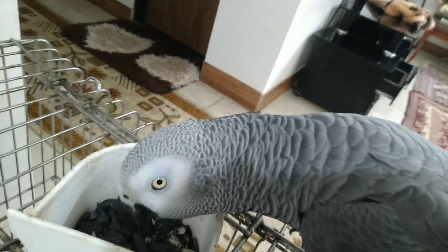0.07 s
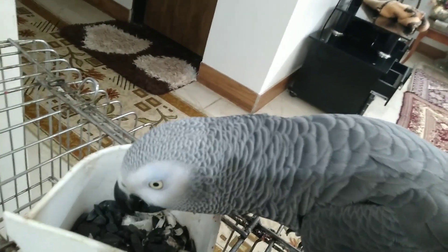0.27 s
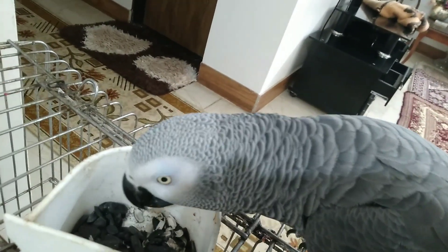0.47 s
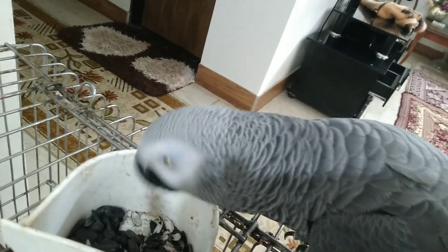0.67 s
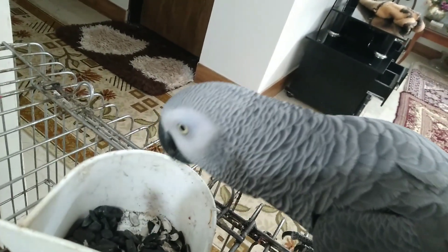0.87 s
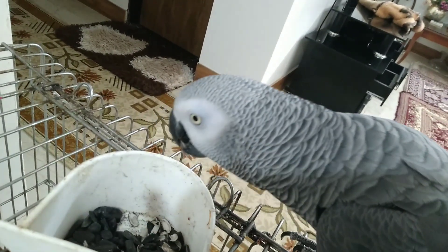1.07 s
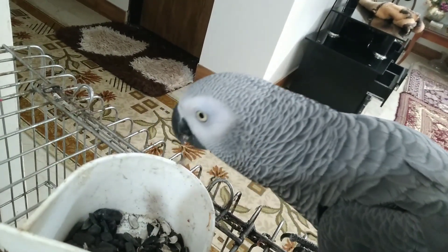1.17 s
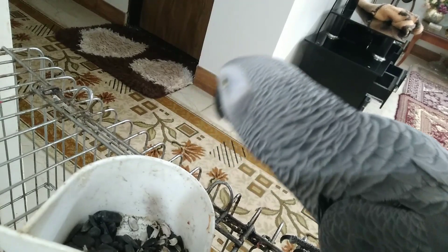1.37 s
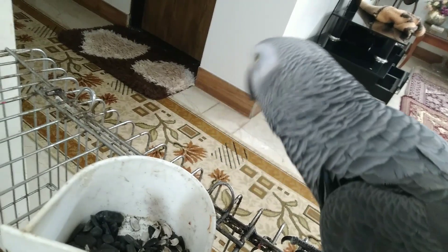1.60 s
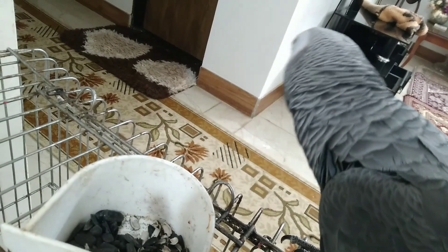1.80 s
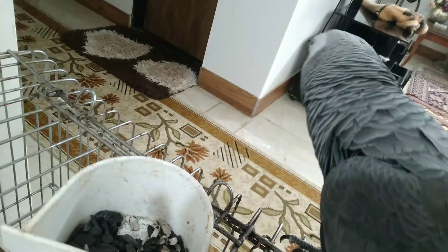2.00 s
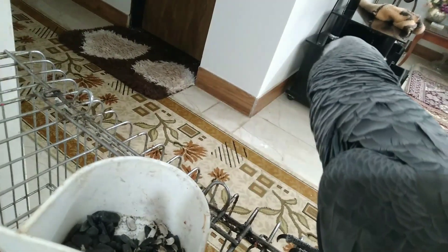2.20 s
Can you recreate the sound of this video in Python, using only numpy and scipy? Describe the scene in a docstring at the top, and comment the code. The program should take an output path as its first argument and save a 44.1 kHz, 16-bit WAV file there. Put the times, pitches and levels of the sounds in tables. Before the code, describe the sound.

A parrot's beak snaps seed shells hard, then ticks, squeaks faintly and drops a clattering husk

```python
"""A parrot cracks seeds over a plastic feeding cup, close to the microphone in a living room.
First come hard cracks: a bright snap, a brief shell ring, a hollow beak knock and fine crackle around them.
From about 1 s there are faint ticks and narrow squeaks as the beak rubs the kernel; at 1.6 s a husk clatters.
Weaker cracks follow near 1.8 and 2.2 s. Filtered noise, clicks and short resonances make these sounds.
Throughout, a decaying noise tail is the room, a low rumble lies below, and a noise gate ducks the pauses."""
import sys
import numpy as np
from scipy import signal
from scipy.fft import rfft, irfft
from scipy.io import wavfile
from scipy.ndimage import uniform_filter1d, minimum_filter1d

SR = 44100
rng = np.random.default_rng(int(sys.argv[2]) if len(sys.argv) > 2 else 0)


def persist_wave(psi):
    """Save psi, clipped to +-1, as 16-bit WAV."""
    counts = np.round(np.clip(psi, -1, 1) * 32767).astype(np.int16)
    wavfile.write(sys.argv[1], SR, np.atleast_2d(counts).T)


N = 99225

# colour of the snapping shell: f/Hz, level/dB
SNAP = [(100, -42), (3000, -47.5), (4100, -44.5), (4800, -26.5), (5500, -7), (6800, -1), (8600, -4),
        (10000, -9.5), (11700, -21.5), (16000, -12)]
# colour of the sizzle at the top of a snap: f/Hz, level/dB
SIZZLE = [(100, -62), (9000, -53.5), (12000, -15.5), (13300, -2), (15200, -4.5), (16500, -7)]


def undb(db):
    """Turn decibels into a gain."""
    return 10 ** (np.asarray(db) / 20)


def curve(points, hz):
    """Read values between (Hz, value) points on a log-frequency axis."""
    p = np.array(points, float)
    return np.interp(np.log(np.maximum(hz, 1)), np.log(p[:, 0]), p[:, 1])


def tint(x, points):
    """Filter a sound by (Hz, dB) points."""
    gain = undb(curve(points, np.fft.rfftfreq(len(x), 1 / SR)))
    return irfft(rfft(x) * gain, len(x))


def impact(points, size=1024):
    """Make a click of the given colour with its energy as early as possible (minimum phase)."""
    log_gain = np.log(undb(curve(points, np.fft.rfftfreq(size, 1 / SR))))
    cepstrum = irfft(log_gain)
    # fold the second half onto the first, so that nothing sounds before the hit
    cepstrum[1:size // 2] *= 2
    cepstrum[size // 2 + 1:] = 0
    return irfft(np.exp(rfft(cepstrum)))


def ring(hz, decay):
    """A resonance that swells and dies quickly; its gain is 1 at its centre."""
    t = np.arange(int(20 * decay * SR)) / SR
    env = t * np.exp(-t / decay)
    return 2 * env / env.sum() * np.sin(2 * np.pi * hz * t)


def add(out, at, x):
    """Mix a sound in at a time in seconds."""
    i = max(int(at * SR), 0)
    out[i:i + len(x)] += x[:max(N - i, 0)]


def unit(x):
    """Scale to rms 1."""
    return x / np.sqrt(np.mean(x ** 2))


def walk(rate):
    """A slow random wander with spread near 1, from smoothed steps at rate per second."""
    k = int(SR / rate)
    steps = np.repeat(rng.standard_normal(N // k + 1), k)
    return unit(uniform_filter1d(steps, k))[:N]


def scatter(x, size=700):
    """Splinters and near reflections follow a click as noise for a few milliseconds."""
    t = np.arange(size) / SR

    def burst(decay, db):
        noise = rng.standard_normal(size) * np.sqrt(t) * np.exp(-t / decay)
        return unit(noise) * undb(db) / np.sqrt(size)

    reflections = burst(decay=0.0022, db=-5)
    splinters = burst(decay=0.00029, db=-3.5)
    response = reflections + splinters
    response[0] = 1  # the click itself
    return np.convolve(x, response / np.linalg.norm(response))


def grains(length, colour):
    """A dense run of tiny ticks at random times with uneven strengths, rms 1."""
    ticks_per_s, spread_db = 650, 5.5
    n = int(length * SR)
    hit = rng.random(N)[:n] < ticks_per_s / SR
    size = rng.standard_normal(N)[:n]
    ticks = hit * np.sign(size) * undb(spread_db * np.abs(size))
    return unit(signal.fftconvolve(ticks, colour)[:n])


def cracks():
    """A shell snaps and rings; the beak knocks and clacks, and the cup's resonances answer."""
    # cracks: t/s, snap level/dB, sizzle level/dB, shell ring f/Hz, ring level/dB,
    # hollow knock f/Hz, knock level/dB, beak clack f/Hz, clack level/dB
    crack_table = [ (0.019, -21, -33, 14400, -0.5, 1200, -37.5, 2400, -23.5),
                   (0.0449, -3.5, -6, 6300, -12.5, 1231, -35, 2650, -17.5),
                   (0.0496, -17.5, -13.5, 7300, -26.5, 1200, -40.5, 2650, -20.5),
                   (.0820, 10.5, -4, 6500, 14.5, 1193, -5, 2300, -3.5),
                   (0.0855, 5, -16, 6300, 6, 1422, -8.5, 2680, -9),
                   (0.0879, 3, 5.5, 15400, 13, 1200, -10, 2905, -14),
                   (0.1563, -18.5, -10.5, 8600, -12.5, 1210, -22.5, 2400, -25),
                   (0.2095, -9, -7, 15400, -6, 1048, -18, 2700, -9.5),
                   (0.2116, -4.5, -20.5, 5850, 4, 1000, -15, 2350, -9.5),
                   (0.2343, -2.5, -26.5, 5980, 6, 960, -12, 2700, -17.5),
                   (0.2849, -6.5, -23, 6200, -13.5, 1074, -31, 1897, -19),
                   (0.2948, -7, -2.5, 8500, 5.5, 584, -15, 1930, -15),
                   (0.4236, -11, 2.5, 14900, -4, 581, -13.5, 2200, -40),
                   (0.433, -11.5, -11, 13500, -13.5, 970, -30.5, 2200, -26),
                   (0.44, 9.5, 8, 13800, 9.5, 965, -8.5, 2200, -6.5),
                   (0.4401, -8, 3.5, 5900, 14.5, 1200, -13, 3700, -9),
                   (0.4423, 4, 2.5, 6250, 5, 1250, -21, 4200, -9.5),
                   (0.4872, -0.5, -0.5, 15000, -7, 1000, -17, 2200, -12),
                   (.5197, -9.5, -6, 7200, -15, 570, -27, 2200, -36.5),
                   (0.5469, -7, -1, 7100, -11.5, 581, -18.5, 2300, -26),
                   (0.7112, -5.5, -6, 6600, -10, 580, -25.5, 2200, -28.5),
                   (.7848, 0, -6, 5500, 3, 680, -5.5, 2170, -1.5),
                   (0.7853, 3.5, 0, 6700, 15.5, 902.3, -1, 2900, -7),
                   (0.786, 2.5, -1.5, 15000, 5, 1800, -13, 2520, -3),
                   (1.749, -8.5, -42, 6600, -11, 1390, -17.5, 2000, -21.5),
                   (1.7755, -5, -28, 4700, -14, 1198, -21, 2410, -23),
                   (1.795, -7, -31, 8700, -4.5, 600, -14, 2380, -18),
                   (1.7998, -15, -35, 6680, -15, 587, -12, 2380, -24),
                   (2.1975, -9, -15, 10500, -6.5, 1200, -13.5, 2700, -19),
                   (2.2032, -18, -34, 6540, -7, 1450, -19, 2250, -28), ]
    # cup resonances: f/Hz, decay/s, relative level/dB
    cup_modes = [(722, .012, -4.5), (901.5, 0.0099, -4.5), (980, 0.02, -4.5), (1191.5, 0.02, -1),
                 (2000, 0.016, -4.5), (2657, 0.0088, -2.5), (2890, 0.012, -8.5)]
    shell_decay_s, knock_decay_s, clack_decay_s = 0.00038, 0.0019, 0.0011
    shell, rings, beak = np.zeros(N), np.zeros(N), np.zeros(N)
    snap, sizzle = impact(SNAP), impact(SIZZLE)
    for at, snap_db, top_db, ring_hz, ring_db, knock_hz, knock_db, clack_hz, clack_db in crack_table:
        add(shell, at, scatter(undb(snap_db) * snap + undb(top_db) * sizzle))
        add(rings, at, scatter(undb(ring_db) * ring(ring_hz, shell_decay_s)))
        add(beak, at, undb(knock_db) * ring(knock_hz, knock_decay_s))
        add(beak, at, undb(clack_db) * ring(clack_hz, clack_decay_s))
    # shell rings keep only their part above 5000 Hz
    rings = signal.sosfilt(signal.butter(6, 5000, "high", fs=SR, output="sos"), rings)
    cup = np.zeros(N)
    for hz, decay, mode_db in cup_modes:
        cup += undb(mode_db) * signal.fftconvolve(beak, ring(hz, decay))[:N]
    return shell + rings + beak + undb(3.0) * cup  # lifts all cup levels


def crackle():
    """Dense runs of tiny bright ticks: fine crackle and sizzling tails around the cracks."""
    # crackle: start t/s, length/s, rms level/dB
    crackle_table = [(0, 0.062, -53.5), (0.219, .12, -55.5), (0.562, 0.074, -59), (0.713, 0.023, -52),
                     (0.776, 0.14, -56.5), (1.612, 0.011, -56)]
    out = np.zeros(N)
    tick = impact(SNAP) + undb(-7.5) * impact(SIZZLE)
    for at, length, db in crackle_table:
        add(out, at, undb(db) * grains(length, tick))
    return out


def rubs():
    """The beak slides over the kernel: a soft, narrow squeak that swells, fades and sags in pitch."""
    # rubs: start t/s, length/s, squeak f/Hz, rms level/dB
    rub_table = [(1.003, 0.046, 6410, -64), (1.005, 0.022, 8360, -64.5), (1.51, .025, 6750, -69.5),
                 (1.764, .02, 6400, -53), (1.792, .012, 6435, -44.5), (1.806, 0.099, 6540, -63),
                 (1.892, .09, 5770, -68), (2.156, 0.037, 6580, -57.5), (2.154, .03, 8200, -63),
                 (2.155, 0.049, 5030, -69), (2.193, 0.058, 6480, -53)]
    width_hz, sag_hz_per_s = 390, 2000
    rise = 0.2  # share of the length
    lowpass = signal.butter(2, width_hz / 2, fs=SR, output="sos")
    out = np.zeros(N)
    for at, length, hz, db in rub_table:
        t = np.arange(int(length * SR)) / SR
        noise = rng.standard_normal(N) + 1j * rng.standard_normal(N)
        rough = signal.sosfilt(lowpass, noise)[-len(t):]  # the end, where the filter has settled
        # shift the slow noise up to the falling squeak pitch
        squeak = (rough * np.exp(2j * np.pi * (hz - sag_hz_per_s * t / 2) * t)).real
        swell = np.interp(t / length, [0, rise, 1], [0, 1, 0])
        add(out, at, undb(db) * unit(squeak * swell))
    return out


def nibbles():
    """The beak turns the kernel with tiny ringing ticks."""
    # faint nibbles: t/s, ring f/Hz, level/dB
    nibble_table = [(1.015, 14180, -18), (1.125, 6140, -13)]
    out = np.zeros(N)
    for at, hz, db in nibble_table:
        add(out, at, scatter(undb(db) * ring(hz, decay=0.00049)))
    return out


def clatter():
    """A husk strikes something hard, bounces and skitters to rest as a fading run of ticks."""
    # husk strikes: t/s, level/dB
    strike_table = [(1.619, -1.5), (1.6202, -8), (1.6207, 0), (1.6217, -1), (1.6499, -7), (1.652, -8.5)]
    # colour of a strike: f/Hz, level/dB
    husk_colour = [(100, -33), (850, -55.5), (1250, -16), (1800, -10), (3000, -8), (4200, -21), (5200, -11),
                   (5950, 3), (7200, -3), (8400, -1), (11000, -14), (15500, -14.5)]
    # colour of the skittering husk: f/Hz, relative level/dB
    skitter_colour = [(100, -40), (850, -27), (1250, -2), (1850, 6.5), (3000, -16), (4200, -11), (5200, -6),
                      (5950, 0), (8400, 0), (11000, -4), (15500, -14)]
    skitter_at_s, skitter_length_s = 1.628, 0.074
    skitter_start_db, fade_db_per_s = -45, 81.5
    out, tick = np.zeros(N), impact(husk_colour)
    for at, db in strike_table:
        add(out, at, scatter(undb(db) * tick))
    slide = grains(skitter_length_s, impact(skitter_colour))
    t = np.arange(len(slide)) / SR
    add(out, skitter_at_s, scatter(slide * undb(skitter_start_db - fade_db_per_s * t)))
    return out


def room(x):
    """The room's diffuse tail: noise bands that each die away at their own speed."""
    # time to fall by 60 dB: f/Hz, time/s
    decay_times = [(300, .6), (1500, 0.35), (6500, 0.528), (10000, 0.47), (15000, 0.62)]
    # tail colour: f/Hz, level/dB
    tail_colour = [(200, -2.5), (1000, -3.5), (2400, -4.5), (4000, -5.5), (6500, -16), (10000, -10.5),
                   (12500, -11), (14800, -19), (16500, -13)]
    t = np.arange(SR) / SR
    noise, hz = rfft(rng.standard_normal(SR)), np.fft.rfftfreq(SR, 1 / SR)
    tail = np.zeros(SR)
    for centre, t60 in decay_times:
        # each band overlaps its neighbours, and all shares add up to 1
        share = curve([(f, f == centre) for f, _ in decay_times], hz)
        build_up = 1 - np.exp(-t / 0.0022)
        env = np.exp(-np.log(1000) * t / t60) * build_up
        tail += irfft(noise * share, SR) * env / np.linalg.norm(env)
    return signal.fftconvolve(x, tint(tail, tail_colour))[:N]


def low_tones():
    """Low tones swell briefly in the room's background noise, each a short resonance."""
    # low background tones: t/s, f/Hz, peak level/dB
    tone_table = [(0.025, 408.4, -46), (0.156, 429.7, -49.5), (.205, 229.3, -48), (0.982, 394, -52),
                  (.49, 541, -51), (.55, 578.4, -51.5), (.615, 575.4, -51.5), (0.602, 141, -57.5),
                  (0.707, 242, -50.5), (1.086, 224, -45), (1.249, 335, -56.5), (1.55, 580, -56),
                  (1.689, 106, -51), (2.089, 204, -49.5)]
    out = np.zeros(N)
    for at, hz, db in tone_table:
        tone = ring(hz, decay=0.0094)
        add(out, at, undb(db) * tone / np.abs(tone).max())
    return out


def ambience():
    """Low rumble whose bands waver on their own, faint hiss and two narrow drones, all from noise."""
    # colour of rumble and hiss: f/Hz, relative level/dB per Hz
    rumble_colour = [(25, -23.5), (50, -4), (100, -6), (150, -2.5), (230, 3), (330, -3.5), (470, -11),
                     (580, -9), (720, -23), (1200, -24), (2400, -26.5), (3300, -34.5), (8000, -30),
                     (16000, -38)]
    # steady room tones: f/Hz, width/Hz, rms level/dB
    drone_table = [(98.4, 9.7, -71), (563, 30, -73.5)]
    rumble_db, waver_db = -59, 3
    base = unit(tint(rng.standard_normal(N), rumble_colour)) * undb(rumble_db)
    f, out = np.fft.rfftfreq(N, 1 / SR), base
    band = np.round(2 * np.log2(np.maximum(f, 1) / 100))  # half octaves counted from 100 Hz
    for k in range(-2, 8):
        part = irfft(rfft(base) * (band == k), N)
        out = out + part * (undb(waver_db * walk(rate=24)) - 1)
    for hz, width, db in drone_table:
        peak = 1 / (1 + (2 * (f - hz) / width) ** 2)
        out = out + undb(db) * unit(irfft(rfft(rng.standard_normal(N)) * peak, N))
    return out


def scene():
    """Sum the close beak sounds and the husk, their room tail, the low tones and the background."""
    near, faint, husk = cracks() + crackle() + rubs(), nibbles(), clatter()
    # levels into the room, in dB
    tail = room(undb(0.5) * near + undb(3) * faint + undb(2.5) * husk)
    return (near + faint + husk + tail + low_tones() + ambience())[None]


def record(dry):
    """A noise gate opens on loud treble and turns down once it has died away; the top is cut."""
    open_db, close_db, depth_db = -41.5, -54.5, 12
    window_s, hold_s = 0.016, 0.002
    sense_hz, top_hz = 2990, 16000
    treble = signal.sosfilt(signal.butter(2, sense_hz, "high", fs=SR, output="sos"), dry[0])
    power = np.abs(uniform_filter1d(treble ** 2, int(window_s * SR)))
    level_db = 10 * np.log10(power + 1e-18)
    held_db = -minimum_filter1d(-level_db, int(hold_s * SR))  # highest level nearby

    def last(happens):
        """Sample number of the latest time that something was true."""
        return np.maximum.accumulate(happens * np.arange(N))

    settled = np.arange(N) > window_s * SR  # the gate cannot shut before this
    last_close = last(settled & (held_db < close_db))
    last_open = last(held_db > open_db)
    shut = 1. * (last_close > last_open)
    gain = undb(-depth_db * uniform_filter1d(shut, size=200))  # smooth the switching
    return signal.sosfilt(signal.ellip(8, .2, 70, top_hz, fs=SR, output="sos"), dry * gain)


dry = scene()
out = record(dry)
persist_wave(out)
```